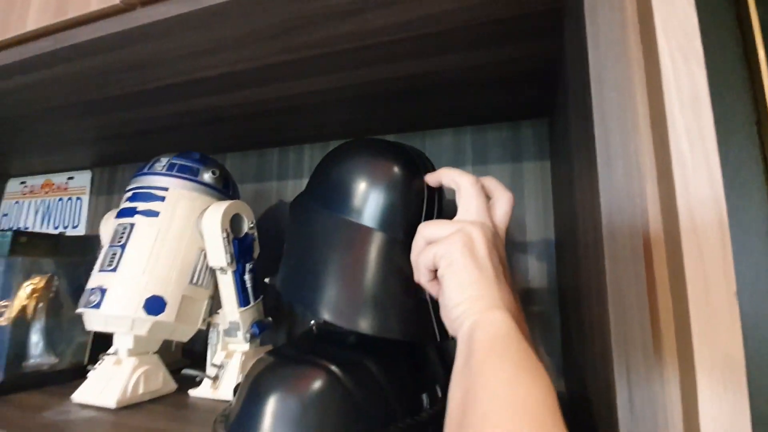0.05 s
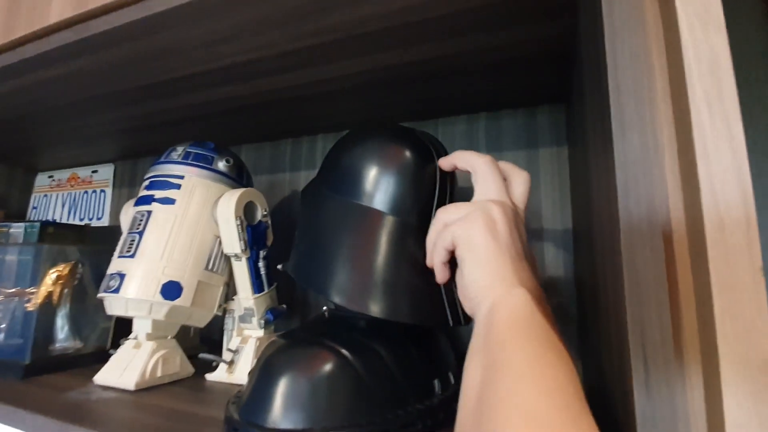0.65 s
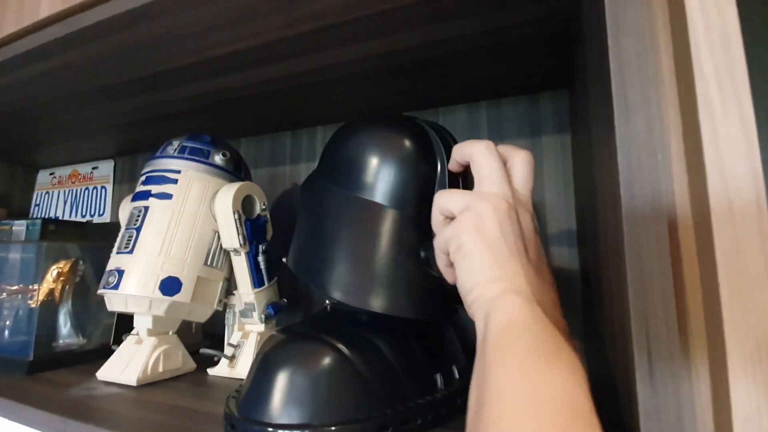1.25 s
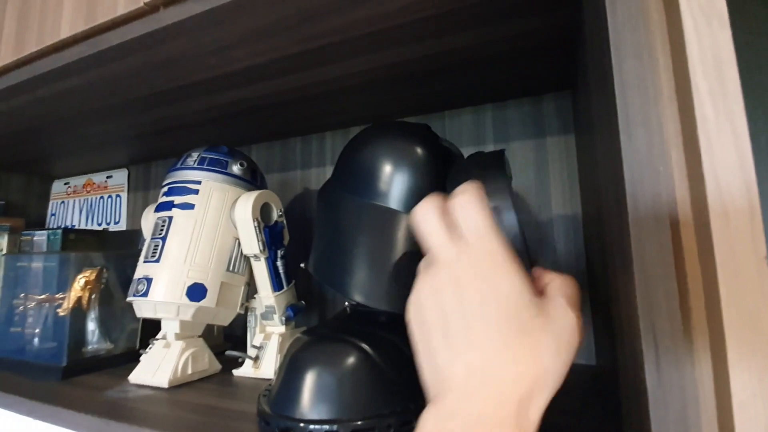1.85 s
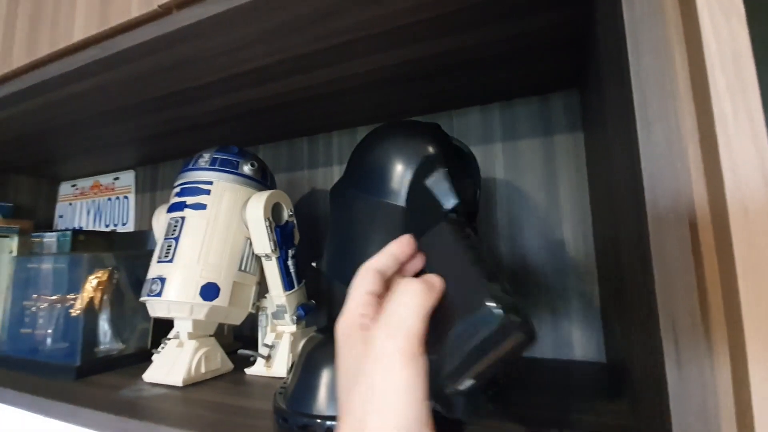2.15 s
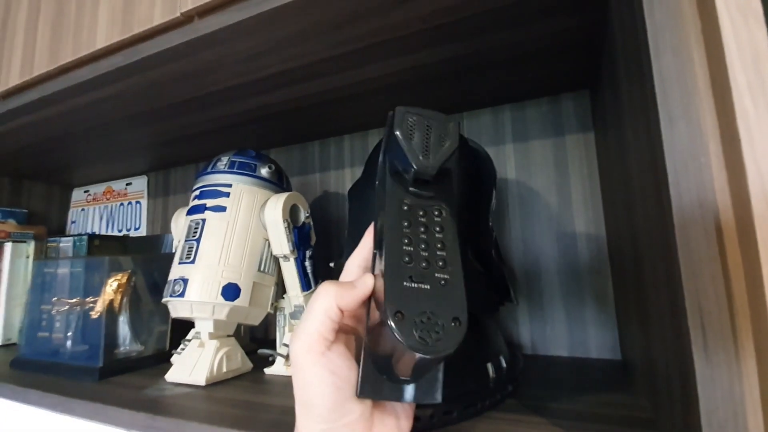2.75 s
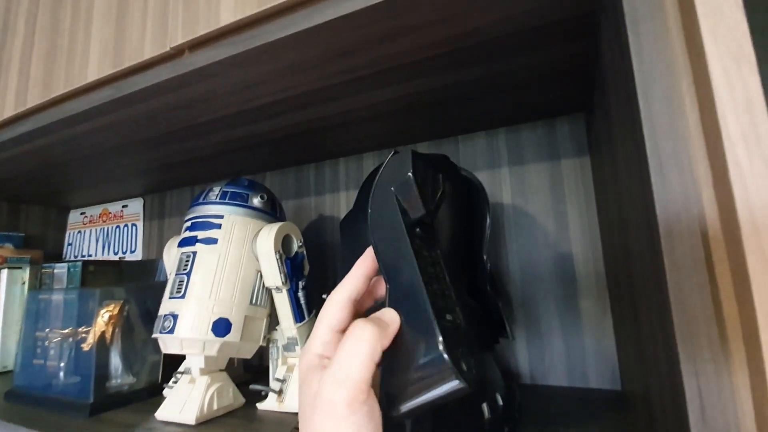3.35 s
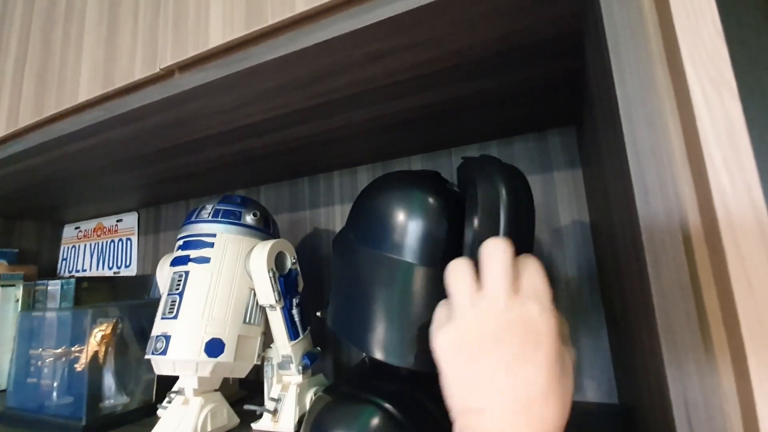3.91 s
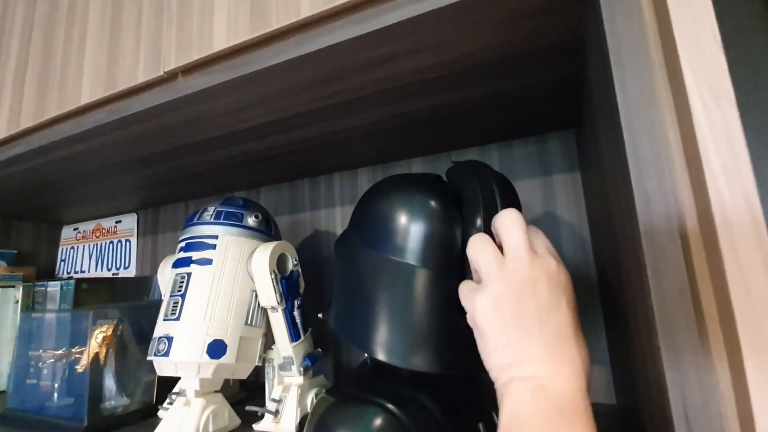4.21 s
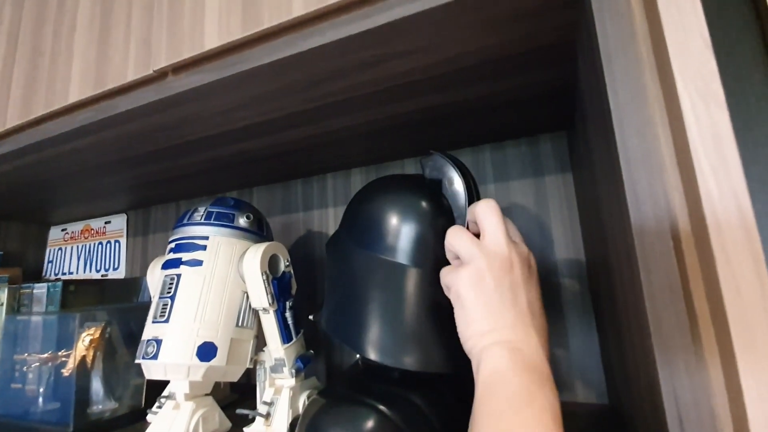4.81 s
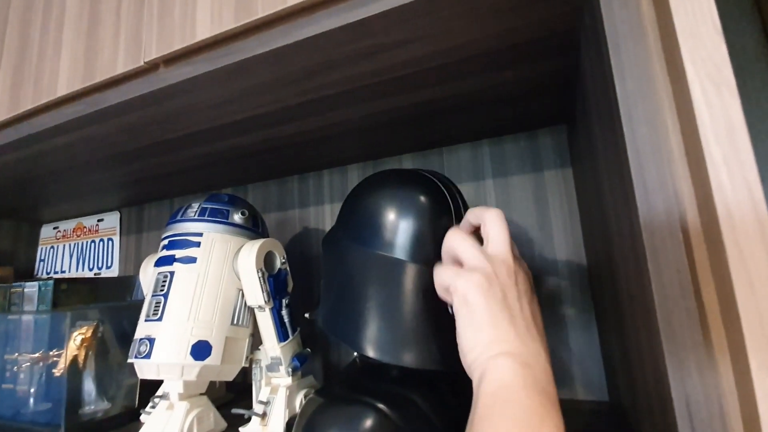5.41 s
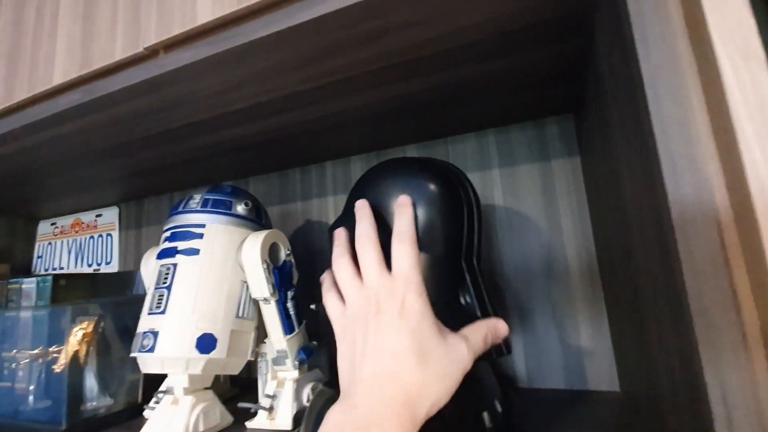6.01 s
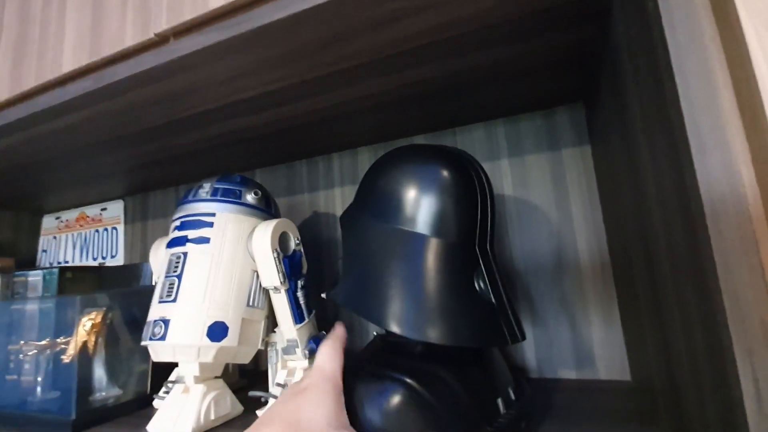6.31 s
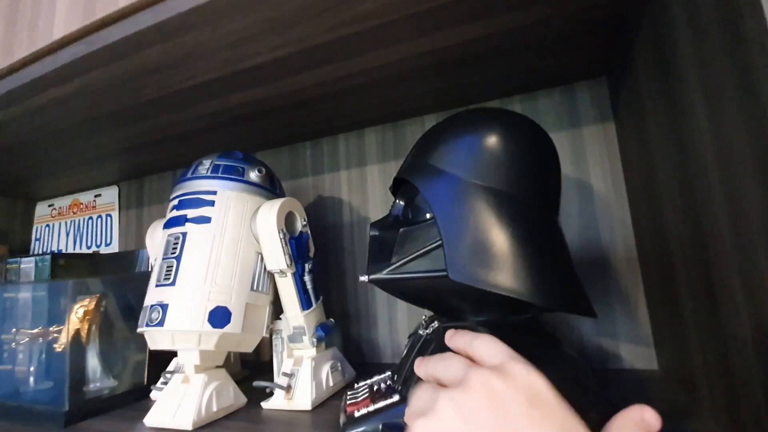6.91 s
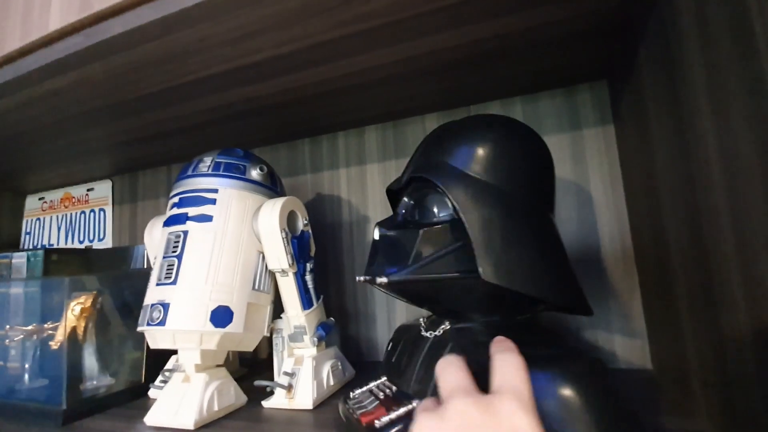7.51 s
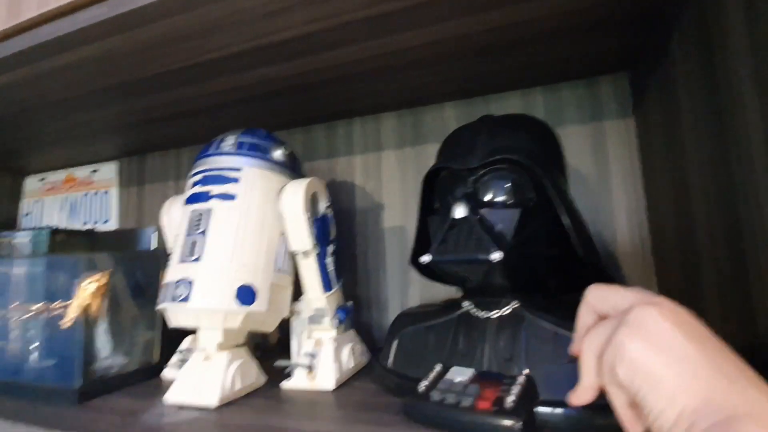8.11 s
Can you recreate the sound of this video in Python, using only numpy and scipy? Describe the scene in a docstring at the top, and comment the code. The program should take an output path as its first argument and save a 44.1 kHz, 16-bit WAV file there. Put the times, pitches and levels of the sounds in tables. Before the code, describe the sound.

A hollow plastic telephone handset knocks, rubs and clatters out of its cradle and back, then the base slides hissing on a wooden shelf.

```python
"""Hollow plastic knocks, close by: a telephone handset is worked out of its cradle on a plastic bust,
turned over and fumbled back until it latches. Each contact rings the shell inside a wooden shelf
niche, and plastic rubs, rattles and squeaks on plastic in between. Then the base is twisted round on
the shelf in two hissing slides. A quiet room rumbles around the pair of microphones."""
import sys
import numpy as np
from scipy import signal
from scipy.fft import rfft, irfft, next_fast_len
from scipy.io import wavfile
from scipy.ndimage import uniform_filter1d

SR = 44100
rng = np.random.default_rng(int(sys.argv[2]) if len(sys.argv) > 2 else 0)


def persist_wave(psi):
    """Save psi, clipped to +-1, as 16-bit WAV."""
    counts = np.round(np.clip(psi, -1, 1) * 32767).astype(np.int16)
    wavfile.write(sys.argv[1], SR, np.atleast_2d(counts).T)


N = 359723

# Handset on cradle, close to the microphones: start_s, level_db, weight_db, hardness_db, wall_hz
# Weight is the hollow thump and hardness the snap, both against the level of the clack.
CRADLE_KNOCKS = [(0.013, -34, 0.5, -16.5, 1065), (0.092, -38.5, -4, -2, 1184),
                 (0.245, -36.5, -7.5, -18, 1190), (0.31, -38, -6, -0.5, 1163),
                 (0.521, -28, -9, -14.5, 1058), (0.655, -28, -6, -16, 620), (0.762, -15, -3, -13, 760),
                 (0.774, -19, -13, -6, 1062), (0.926, -17.5, -15, -13, 776),
                 (0.996, -31.5, -17, -12.5, 1190), (1.033, -20.5, -9, -7.5, 1146),
                 (1.088, -23.5, -2.5, -13, 1340), (1.1, -19.5, -6, -7, 620),
                 (1.11, -19, -11.5, -14.5, 1135), (1.131, -26.5, -18.5, -9.5, 1038),
                 (1.359, -19.5, -14.5, -17.5, 1165), (1.402, -18.5, -5.5, -18.5, 802),
                 (1.426, -29.5, 1, -11, 692), (1.452, -16.5, -19, -16.5, 1070),
                 (1.463, -18.5, -11, -19.5, 783), (1.582, -20, -9, -16.5, 830), (1.64, -25, -5, -15, 842),
                 (1.7, -35.5, 4, -4, 760), (1.736, -22.5, -8.5, -13, 1223), (1.763, -29.5, -3, -7.5, 848),
                 (1.951, -29.5, -5.5, -5.5, 1090), (1.958, -22.5, -5, -12.5, 1169),
                 (2.098, -25.5, -0.5, -12, 783), (3.898, -15.5, -16.5, -4.5, 1542),
                 (3.906, -26, 1, -13, 432), (4.141, -33, 2, -20.5, 823), (4.326, -10.5, -13.5, -13.5, 810),
                 (4.42, -8.5, -16, -16.5, 697), (4.427, -13, -17.5, -29, 700),
                 (4.439, -10.5, -14, -13, 651), (4.47, -14.5, -10.5, -12, 1103),
                 (4.582, -11.5, -20.5, -11, 1225), (4.686, -19, -3.5, -10.5, 794),
                 (4.724, -21, -7, -11.5, 738), (4.908, -37, -1, -12.5, 635), (5.106, -34, -9.5, -21, 794),
                 (5.186, -28.5, -7, -15, 696), (5.27, -26.5, -3, -6.5, 1210), (5.303, -19.5, -2.5, -9, 677),
                 (5.317, -30, 1, -13.5, 750), (5.361, -20.5, -6, -8.5, 770), (5.374, -19, -12, -5.5, 1192),
                 (5.393, -14.5, -13.5, 1.5, 744), (5.543, -31, 1.5, -14.5, 1110),
                 (5.747, -15.5, -8.5, -10, 1173)]
# Thin clicks as an edge catches and lets go: start_s, level_db
EDGE_CLICKS = [(0.217, -38.5), (0.465, -51.5), (0.312, -43.5), (0.748, -34), (0.762, -23), (1.1, -38),
               (1.315, -45.5), (3.494, -52), (3.757, -59), (4.659, -36), (4.723, -34.5), (4.825, -66),
               (5.034, -37), (5.374, -22.5), (5.393, -23.5), (5.698, -59)]


def handset_knocks():
    """The handset strikes the cradle and catches on its edges."""
    out = np.zeros((2, N))
    for start_s, db, weight_db, hardness_db, wall_hz in CRADLE_KNOCKS:
        add(out, start_s, contact(db, db + weight_db, db + hardness_db, wall_hz))
    for start_s, db in EDGE_CLICKS:
        click = contact(clack_db=db + 3, thump_db=db - 3, snap_db=db, wall_hz=1124,
                        fizz_db=-6.5, clack_t60_s=0.088, niche_s=0.0075, crack_s=0.006)
        add(out, start_s, click)
    return out


# Modes of the hollow shell: pitch_hz, level_db, t60_s
SHELL_MODES = [(173, -2.5, 0.19), (198.3, -2, 0.32), (245, -3.5, 0.076), (312, -7.5, 0.051),
               (443, -5.5, 0.14), (501.6, -6.5, 0.11), (681, -2.5, 0.11), (721, -0.5, .16), (789, -1, 0.24),
               (914, -15, .15), (1084, -4, 0.19), (1164.4, 1.5, 0.12), (1239, -2, .12), (1350, -2.5, 0.058),
               (1496, -6, 0.17), (1856, -9.5, .12), (1980, -9, .11), (2380, -2, 0.11), (2504, -9, 0.19),
               (3140, -22.5, .07), (3640, -21.5, .1), (4470, -17, 0.17)]
# Crowded, heavily damped modes of the plastic: frequency_hz, density_db
CLACK_SPECTRUM = [(60, -4), (130, -3.5), (200, 7), (400, -2.5), (550, -3.5), (800, 1), (1250, -2.5),
                  (1800, -0.5), (3500, -7.5), (5000, -16), (7000, -23), (10500, -24), (15500, -33.5)]
# Borders between thump, clack, snap and fizz: low_hz, mid_hz, high_hz
BAND_EDGES = [450, 1700, 5500]
LOW_HZ, MID_HZ, HIGH_HZ = BAND_EDGES


def contact(clack_db, thump_db, snap_db, wall_hz,
            fizz_db=-17.5, clack_t60_s=0.1, niche_s=0.0096, crack_s=0.011):
    """One blow: a clack held briefly between the niche walls, a ringing shell, wall and cavity notes."""
    t = np.arange(SR // 4) / SR
    cavity_hz = 197.7 * np.exp(0.11 * rng.standard_normal())  # shifts as the hand covers the hollow
    notes = np.sin(2 * np.pi * wall_hz * t) + amp(-5) * np.sin(2 * np.pi * cavity_hz * t)
    notes *= decay(t, t60_s=0.14)
    wall_peak = [(wall_hz / 1.6, 0), (wall_hz, 5), (wall_hz * 1.6, 0)]
    burst = colour(colour(stereo_noise(len(t)), CLACK_SPECTRUM), wall_peak)
    burst *= decay(np.maximum(t - niche_s, 0), clack_t60_s)
    blow = unit_rms(burst) + amp(-4) * unit_rms(ring(SHELL_MODES, t)) + amp(-5) * unit_rms(notes)
    blow *= np.sqrt(np.minimum(t / 0.0025, 1)) * np.minimum((t[-1] - t) / 0.05, 1)
    thump, upper = split(blow, LOW_HZ)
    thump *= 1 - np.exp(-t / 0.0054)  # the air in the hollow takes a moment to swing
    clack, treble = split(upper * (1 + 0.3 * np.exp(-t / niche_s)), MID_HZ)
    # The harder the edge that lands, the more of the treble comes in a first crack.
    crack = 1 + 0.91 * amp(min(snap_db - clack_db + 3.5, 6)) * np.exp(-t / crack_s)
    snap, fizz = split(treble * crack, HIGH_HZ)
    onset = np.exp(-t / 0.014)  # each band's level is set over its first moments
    onset /= onset.sum()
    bands = [(thump, thump_db - 6.5), (clack, clack_db - 10),
             (snap, snap_db - 4.5), (fizz, snap_db + fizz_db - 5.5)]
    return sum(amp(db) * band / np.sqrt((band ** 2).mean(0) @ onset) for band, db in bands)


def ring(modes, t):
    """Dying modes, excited differently by each blow; high ones reach the microphones out of step."""
    hz, db, t60_s = np.transpose(modes)
    strength, phase, skew, grip = rng.standard_normal((len(hz), 4)).T
    hz = hz * (1 + 0.006 * grip)  # the hand detunes the shell
    apart = skew * np.arccos(curve_at(MIC_CORRELATION, hz)) / 2
    phases = np.pi * phase + np.array([apart, -apart])
    waves = np.exp(2j * np.pi * hz[:, None] * t) * decay(t, t60_s[:, None])
    return ((amp(db + 2 * strength) * np.exp(1j * phases)) @ waves).imag


# Plastic rubbing in the cradle, between the knocks: start_s, length_s, scrape_db, rasp_db
CRADLE_RUBS = [(0.098, 0.18, -53.5, -57), (0.69, 0.084, -54, -64), (0.86, 0.23, -48.5, -54.5),
               (1.1, 0.17, -57.5, -46.5), (1.33, 0.24, -46, -52.5), (1.58, 0.22, -44, -57),
               (1.8, 0.15, -50, -57.5), (3.95, 0.13, -47, -59), (4.069, 0.25, -61, -77.5),
               (4.531, 0.25, -46.5, -57), (4.947, 0.17, -57.5, -56), (5.165, 0.18, -48, -54.5),
               (5.274, 0.12, -43, -47.5), (5.411, 0.16, -53.5, -59.5), (5.902, 0.17, -62, -62)]
# That friction from close by: frequency_hz, density_db
RUB_SPECTRUM = [(70, -18), (130, -8), (200, 0.5), (330, -13), (550, -10), (800, -14.5), (1200, -14),
                (1600, -16), (2500, -14.5), (4200, -21), (7000, -30), (11000, -29), (15500, -44.5)]
RUB_ATTACK_S, RUB_RELEASE_S = 0.017, 0.054


def rubbing(slips_per_s=6000):
    """Tiny stick-slip releases rasp at the surface while the shell's low modes give a hollow scrape."""
    slips = stereo_noise(N) * amp(3 * np.minimum(rng.exponential(1, N), 4))
    slips *= rng.random(N) < slips_per_s / SR
    rasp = split(colour(slips, RUB_SPECTRUM), MID_HZ)[1]
    shaking = rng.standard_normal((1, N))
    shell = signal.oaconvolve(shaking, ring(SHELL_MODES, np.arange(SR // 4) / SR), axes=1)[:, :N]
    hollow = unit_rms(colour(stereo_noise(N), RUB_SPECTRUM)) + amp(-7) * unit_rms(shell)
    boom, scrape = split(split(hollow, MID_HZ)[0], LOW_HZ)
    push, bite = sum(amp(levels_db)[:, None] * stroke(start_s, length_s, RUB_ATTACK_S, RUB_RELEASE_S)
                     for start_s, length_s, *levels_db in CRADLE_RUBS)
    out = push * (amp(-2) * unit_rms(boom) + unit_rms(scrape)) + bite * amp(-1) * unit_rms(rasp)
    return wander(out, depth_db=1.6)


def rattling(slot_s=0.09, taps=4):
    """While it rubs, the loose handset taps the cradle at random, harder as the rub is harder."""
    out = np.zeros((2, N))
    for start_s, length_s, scrape_db, _ in CRADLE_RUBS:
        for slot, (when, softness, spot) in enumerate(rng.random((3, taps)).T):
            delay_s = (slot + when) * slot_s
            db = scrape_db + 12.5 - softness
            tap = contact(db, thump_db=db - 3, snap_db=db - 9.5, wall_hz=987 * 2 ** (spot - 0.5))
            add(out, start_s + delay_s, tap * np.clip((length_s - delay_s) / RUB_RELEASE_S, 0, 1))
    return out


# The push on the base, heard as hiss, one curve a twist: time_s, level_db
TWIST_PUSHES = [
    [(6.42, -61), (6.516, -44), (6.652, -37), (6.872, -44.5), (6.96, -75.5), (7.004, -62.5), (7.04, -78)],
    [(7.2, -61.5), (7.33, -50.5), (7.354, -46.5), (7.516, -42.5), (7.982, -44.5), (8.11, -51),
     (8.157, -47.5)],
]
# Its feet on the wooden shelf, one spectrum a twist: frequency_hz, density_db
TWIST_SPECTRA = [
    [(53, -44), (90, -6), (322, -13.5), (409, -9.5), (566, -23.5), (672, -6.5), (817, -12.5), (950, -4.5),
     (1060, -11.5), (1340, -3.5), (1600, -4.5), (3120, -3), (7410, -19.5), (11200, -16.5), (15800, -24)],
    [(53, -44), (90, -4), (142, -9.5), (214, -1), (322, -13), (400, -7), (519, -12.5), (749, -3.5),
     (817, -7.5), (992, -2), (1110, -3.5), (3120, -9.5), (7250, -15.5), (10700, -14), (15800, -20)],
]
# Dull drag and fine top hiss, one row a twist: drag_db, fine_db
TWIST_BANDS = [(-6.5, -2.5), (-7, -2.3)]


def sliding(full_push_db=-34, drag_follow=0.61, fade_s=0.015):
    """The feet of the base hiss over the shelf, brighter as it is pushed harder."""
    out, t = np.zeros((2, N)), np.arange(N) / SR
    hz = np.geomspace(400, 9000, num=160)
    ripple = np.column_stack([hz, 2 * rng.standard_normal(len(hz))])  # reflections in the niche
    for push, spectrum, (drag_db, fine_db) in zip(TWIST_PUSHES, TWIST_SPECTRA, TWIST_BANDS):
        time_s, level_db = np.transpose(push)
        push_db = np.interp(t, time_s, level_db) - full_push_db
        drag, treble = split(colour(colour(stereo_noise(N), spectrum), ripple), MID_HZ)
        hiss, fine = split(treble, HIGH_HZ)
        bands = [(drag, drag_db + drag_follow * push_db),
                 (hiss, 2.5 + push_db), (fine, fine_db + push_db)]
        grain = 1 + 0.055 * unit_rms(uniform_filter1d(rng.standard_normal(N), size=260))
        moving = stroke(time_s[0], time_s[-1] - time_s[0] + fade_s, fade_s, fade_s)
        out += moving * grain * sum(amp(full_push_db + db) * unit_rms(band) for band, db in bands)
    return wander(out, depth_db=2.5)


# The base rocks on the shelf as it is gripped and let go: start_s, thump_db, snap_db
BASE_BUMPS = [(6.338, -36, -47), (6.387, -49.5, -44), (6.453, -61, -45.5), (6.913, -38, -68),
              (7.059, -55, -60), (7.132, -49, -46), (7.154, -36.5, -41), (7.206, -42, -49),
              (7.957, -40.5, -41.5)]


def bumping():
    """The feet of the base drop on the shelf: a thump and a gritty tick."""
    out = np.zeros((2, N))
    for start_s, thump_db, snap_db in BASE_BUMPS:
        clack_db = (thump_db + snap_db) / 2 + 3.5
        add(out, start_s, contact(clack_db, thump_db, snap_db, wall_hz=840, fizz_db=-5))
    return out


# Light ticks of the handset, held clear of the cradle: start_s, level_db
HANDSET_TICKS = [(2.2893, -31.5), (2.368, -34), (2.4673, -44)]
# The ring of one tick: pitch_hz, level_db, t60_s
TICK_RING = [(2100, 1, .014), (2340, 5, .02), (2600, 1, .014)]


def ticking(click_s=0.0056, rise_s=0.00043):
    """The lifted handset ticks: a short, high ring with a trace of click."""
    out, t = np.zeros((2, N)), np.arange(SR // 10) / SR
    for start_s, db in HANDSET_TICKS:
        treble = split(colour(stereo_noise(len(t)), CLACK_SPECTRUM), hz=1450)[1]
        tick = ring(TICK_RING, t) + amp(-5) * unit_rms(treble) * np.exp(-t / click_s)
        add(out, start_s, amp(db - 9) * tick * np.minimum(t / rise_s, 1))
    return out


# Squeaks in the cradle, then a groan on the shelf: start_s, length_s, from_hz, to_hz, width_hz, level_db
SLIP_TONES = [(1.582, .1, 2430, 2300, 400, -51.5), (1.69, 0.0364, 3560, 2720, 250, -48),
              (1.751, 0.102, 2510, 2280, 400, -50.5), (7.433, .15, 534, 361, 110, -47)]


def squeaking():
    """Slips fall briefly into step: a rough tone that sinks."""
    out = np.zeros((2, N))
    for start_s, length_s, from_hz, to_hz, width_hz, db in SLIP_TONES:
        count = round(length_s * SR)
        glide = np.exp(2j * np.pi * np.cumsum(np.geomspace(from_hz, to_hz, count)) / SR)
        roughness = split(rng.standard_normal(count) + 1j * rng.standard_normal(count), width_hz / 2)[0]
        add(out, start_s, amp(db) * unit_rms((glide * roughness).real * np.hanning(count))[None])
    return out


# Decay of the room beyond the shelf: frequency_hz, t60_s
ROOM_DECAY = [(150, 0.61), (400, .38), (1000, 0.24), (2800, 0.26), (7000, 0.31), (15000, 0.29)]


def room_tail(near, build_s=0.02):
    """Reflections in a small furnished room build into a diffuse tail."""
    hz, t, spectra = signal.stft(stereo_noise(SR // 2), SR, nperseg=256)
    tail = signal.istft(spectra * decay(t, curve_at(ROOM_DECAY, hz)[:, None]), SR, nperseg=256)[1]
    tail *= np.minimum(np.arange(tail.shape[1]) / SR / build_s, 1) ** 2
    return signal.oaconvolve(near, tail / np.linalg.norm(tail[0]), axes=1)[:, :N]


# Room tone all around the microphones: frequency_hz, density_db
RUMBLE_SPECTRUM = [(15, -34.5), (25, -3), (86, -6.5), (152, -21.5), (215, -5), (267, -14.5), (313, -20.5),
                   (340, -19), (469, -23), (509, -26.5), (703, -26), (1050, -39), (1340, -41.5),
                   (6920, -58), (15500, -59)]
# Room modes, the same at both microphones: pitch_hz, width_hz, level_db
ROOM_RESONANCES = [(215.3, 11, -66.5), (267, 5.3, -65.5)]


def rumble(level_db=-52.5):
    """Steady low air noise, swelling in two room modes."""
    hz = np.fft.rfftfreq(N, 1 / SR)
    air = rfft(rng.standard_normal(N))
    boom = sum(amp(db) * unit_rms(irfft(air / (1 + (2 * (hz - pitch_hz) / width_hz) ** 2), N))
               for pitch_hz, width_hz, db in ROOM_RESONANCES)
    return amp(level_db) * unit_rms(colour(stereo_noise(N), RUMBLE_SPECTRUM)) + boom


# How alike the left and right microphones hear: frequency_hz, correlation
MIC_CORRELATION = [(50, 0.72), (150, 0.96), (700, 0.79), (1200, 0.54), (2200, 0), (12000, 0.0063)]


def stereo_noise(count):
    """White noise at two microphones: alike in the bass, unrelated in the treble."""
    size = next_fast_len(count)
    left, other = rfft(rng.standard_normal((2, size)))
    alike = curve_at(MIC_CORRELATION, np.fft.rfftfreq(size, 1 / SR))
    return irfft([left, alike * left + np.sqrt(1 - alike ** 2) * other], size)[:, :count]


def wander(x, depth_db):
    """The colour of friction shifts in patches as the point of contact moves."""
    spectra = signal.stft(x, nperseg=1024, noverlap=768)[2]
    patches = uniform_filter1d(rng.standard_normal(spectra.shape[1:]), size=5, axis=0)
    patches = unit_rms(uniform_filter1d(patches, size=12, axis=1))
    return signal.istft(spectra * amp(depth_db * patches), nperseg=1024, noverlap=768)[1][:, :N]


def stroke(start_s, length_s, attack_s, release_s):
    """The gain of one spell of friction: attack, hold, release."""
    t = np.arange(N) / SR - start_s
    return np.clip(np.minimum(t / attack_s, (length_s - t) / release_s), 0, 1)


def decay(t, t60_s):
    """A fall of 60 dB every t60_s."""
    return 1e-3 ** (t / t60_s)


def amp(db):
    """Decibels to gain."""
    return 10 ** (np.asarray(db) / 20)


def unit_rms(x):
    """Scales to rms 1."""
    return x / np.sqrt(np.mean(x ** 2) + 1e-20)


def curve_at(points, hz):
    """Reads a table on a log-frequency axis."""
    points_hz, values = np.transpose(points)
    return np.interp(np.log(hz + 1), np.log(points_hz + 1), values)


def colour(x, spectrum):
    """Filters a sound by rows of frequency_hz, gain_db."""
    size = next_fast_len(x.shape[-1])
    gain = amp(curve_at(spectrum, np.fft.rfftfreq(size, 1 / SR)))
    return irfft(rfft(x, size) * gain, size)[..., :x.shape[-1]]


def split(x, hz):
    """The parts below and above hz."""
    return [signal.sosfilt(signal.butter(3, hz, kind, fs=SR, output="sos"), x)
            for kind in ("low", "high")]


def add(mix, start_s, sound):
    """Mixes a sound in at start_s."""
    part = mix[:, round(start_s * SR):][:, :sound.shape[1]]
    part += sound[:, :part.shape[1]]


# The telephone's place between the microphones: frequency_hz, left_minus_right_db
MIC_BALANCE = [(200, 0), (600, 0.6), (1100, -2.5), (4000, -4), (8000, -1), (13000, -1.5)]


def scene(room_db=-10):
    """The telephone stands close by and a little to the right, with the room behind it."""
    near = handset_knocks() + ticking() + rubbing() + rattling() + squeaking() + bumping() + sliding()
    left, right = near + amp(room_db) * room_tail(near)
    half_balance = np.array(MIC_BALANCE) * [1, 0.5]
    return np.array([colour(left, half_balance), colour(right, half_balance * [1, -1])]) + rumble()


def record(dry, low_cut_hz=38, top_hz=16000):
    """The low cut and the band limit of the recorder."""
    cut = signal.sosfilt(signal.butter(6, low_cut_hz, "high", fs=SR, output="sos"), dry)
    return signal.oaconvolve(cut, signal.firwin(511, top_hz, window=("kaiser", 9), fs=SR)[None], "same")


dry = scene()
out = record(dry)
persist_wave(out)
```